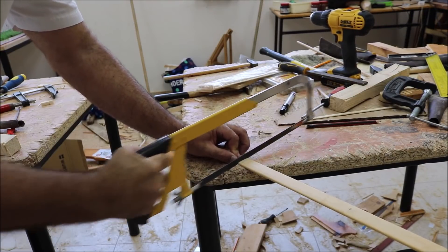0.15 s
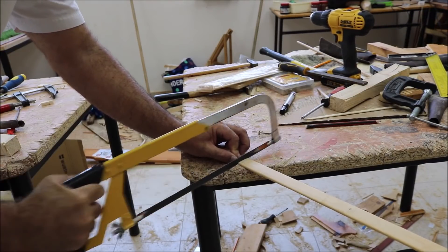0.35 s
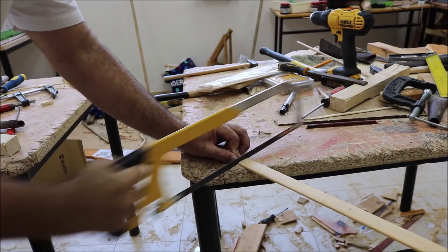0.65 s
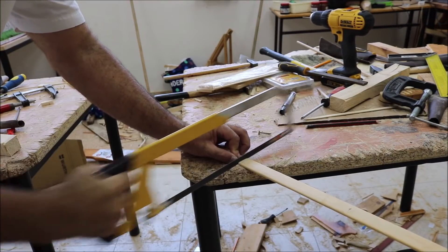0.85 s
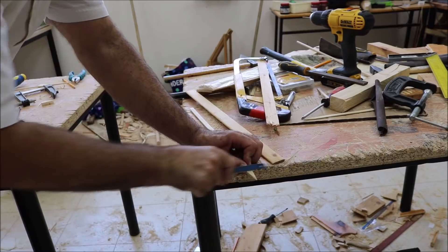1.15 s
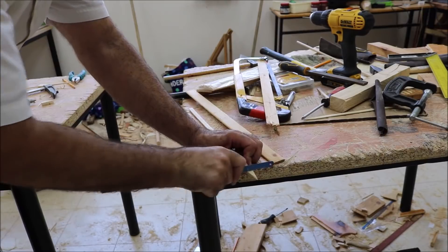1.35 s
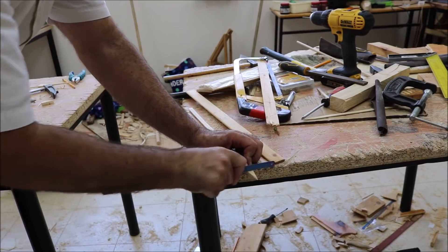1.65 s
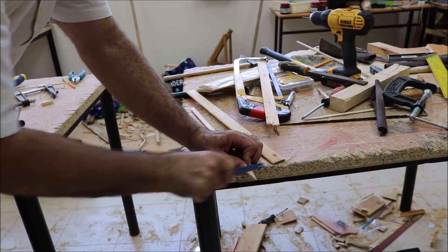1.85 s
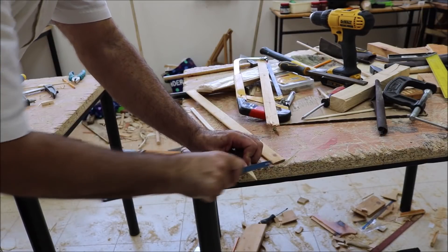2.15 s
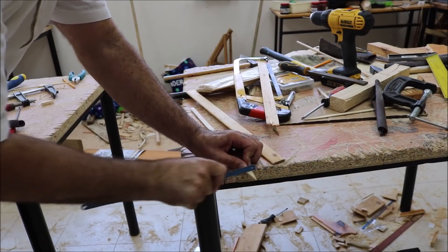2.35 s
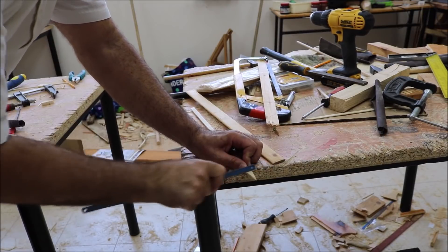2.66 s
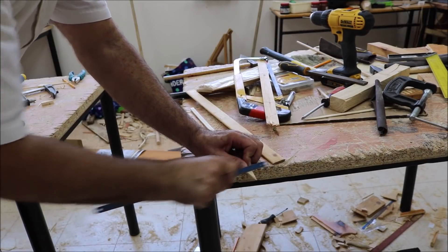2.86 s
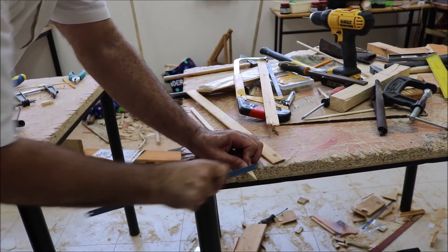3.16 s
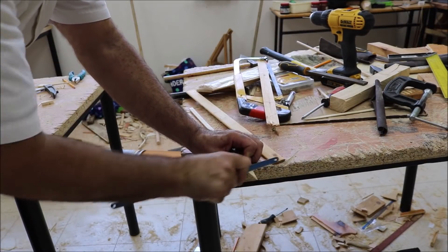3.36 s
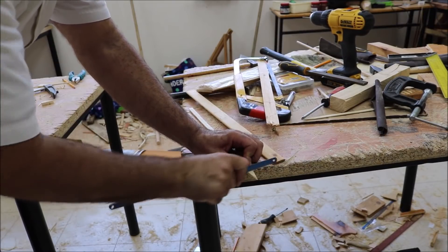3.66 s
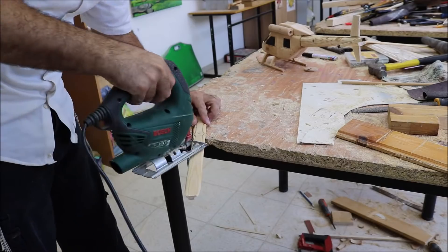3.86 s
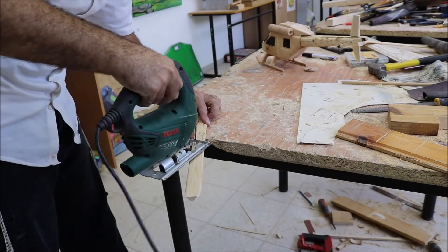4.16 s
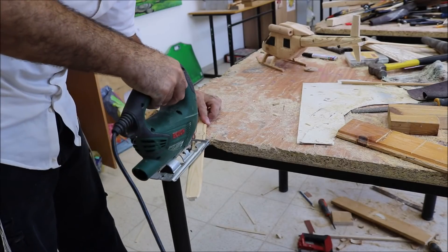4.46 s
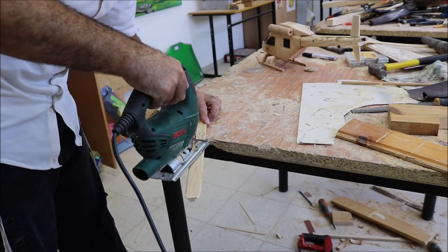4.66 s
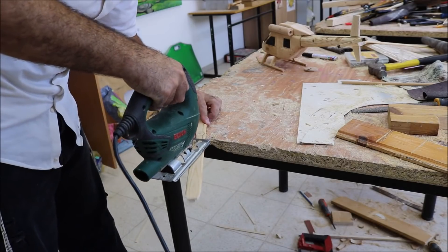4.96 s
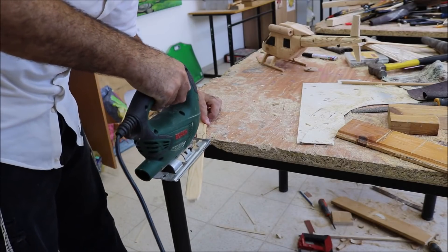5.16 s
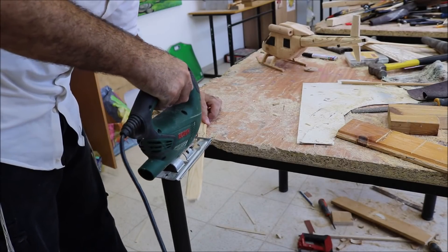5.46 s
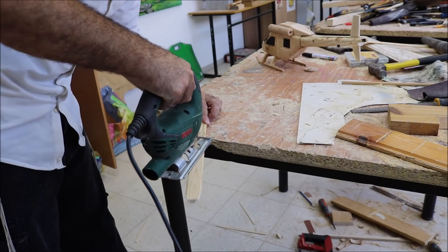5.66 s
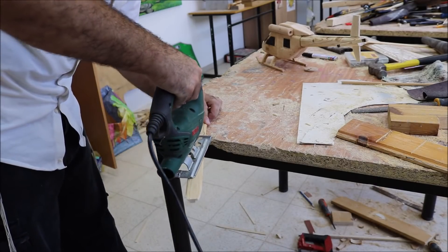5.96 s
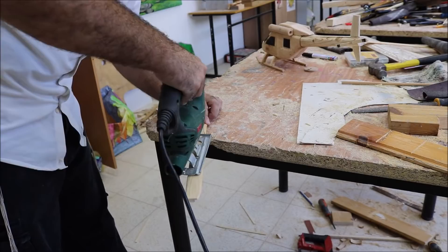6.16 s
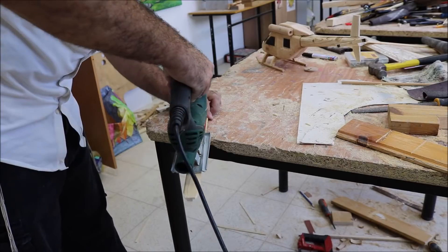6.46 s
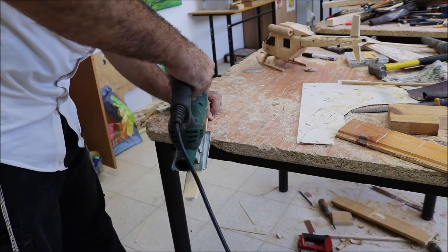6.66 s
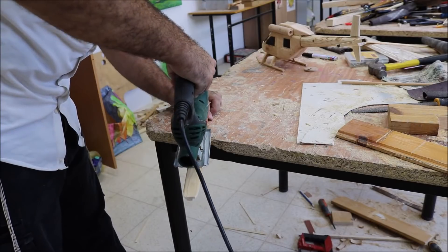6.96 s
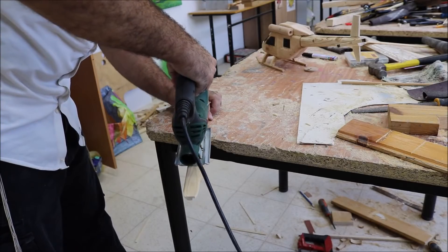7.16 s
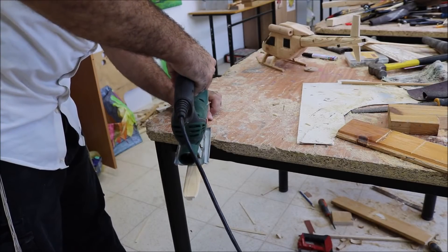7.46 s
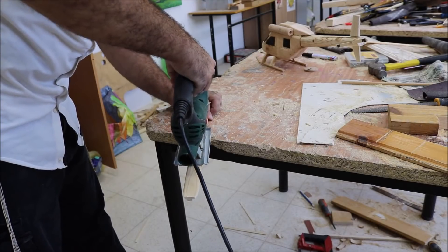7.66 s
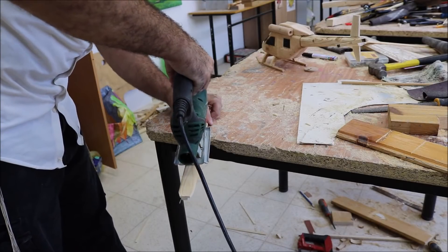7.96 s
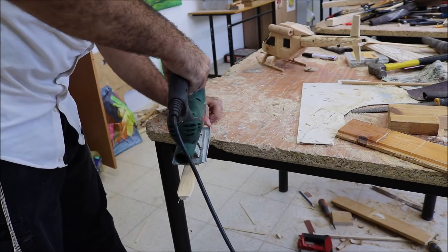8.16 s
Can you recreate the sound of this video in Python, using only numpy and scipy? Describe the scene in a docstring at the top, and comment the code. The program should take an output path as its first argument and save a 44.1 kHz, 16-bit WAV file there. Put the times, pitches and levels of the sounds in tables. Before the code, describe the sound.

Hand saws rasp back and forth through wood in a workshop, followed by an electric jigsaw starting up, cutting and coasting down.

```python
"""A wooden strip is sawn on a bench, over the hum of a small workshop.
0-1 s: a frame hacksaw; its teeth catch and ring the frame and the taut blade.
1-3.8 s: a bare hand-held blade; it rings the strip, tears fibres and shakes the bench.
From 4 s: an electric jigsaw is blipped, runs up, cuts, dips, cuts on and coasts down;
its gears whine and clatter once a stroke, its brushes and fan hiss."""
import sys
import numpy as np
from scipy import signal
from scipy.fft import rfft, irfft, next_fast_len
from scipy.io import wavfile
from scipy.ndimage import uniform_filter1d, map_coordinates

SR = 44100
rng = np.random.default_rng(int(sys.argv[2]) if len(sys.argv) > 2 else 0)


def dump(signal):
    """Clip the signal to [-1, 1] and save it as 16-bit WAV at the path in sys.argv[1]."""
    limited = np.clip(np.atleast_2d(signal).T, -1, 1)
    pcm = np.round(limited * 32767).astype(np.int16)
    wavfile.write(sys.argv[1], SR, pcm)


N = 366471
T = np.arange(N) / SR
N_FFT = next_fast_len(N + SR, True)  # room for tails
TOP_HZ = 15850
FRAME_SPAN_S, BLADE_SPAN_S = (-0.01, 1.017), (1.05, 3.79)
TURNS_PER_STROKE = 6

# workshop hum spectrum: f/Hz, level/dB
SHOP_SPECTRUM = [(18, -81), (30, -49), (189, -12), (245, -11.5), (287, -10), (449, -12), (600, -3),
                 (702, -9.5), (780, -3.5), (1860, -13), (2120, -17), (2290, -18), (16000, -36)]
# workshop hum after the hand saws: t/s, level/dB
SHOP_LEVEL = [(3.96, -47), (4.04, -64), (4.35, -58), (4.8, -71.5), (7.75, -70.5), (8.05, -54), (8.3, -47.5)]
# stereo images: f/Hz, left-right likeness/0-1, left minus right/dB
BENCH_STEREO = [(100, 0.93, 1.5), (332, 0.92, 0.5), (760, 0.8, 2), (1600, 0.32, 0), (2380, 0.05, -2.5),
                (4700, 0.37, -1), (9000, 0.13, -1), (14000, .02, 0.5)]
JIGSAW_STEREO = [(1700, 1, 0.9), (3340, 0.96, 0.49), (4830, 0.5, 1), (9400, 0.28, -2), (13000, 0.55, -1.7)]

# frame saw, pull and push in turn: start/s, body gain/dB, rasp gain/dB
FRAME_STROKES = [(-0.095, -26.5, -43), (0.118, -28.5, -41.5), (0.345, -27, -44.5), (0.562, -27, -42),
                 (0.806, -27.5, -45)]
# bare-blade strokes: start/s, force/dB
BLADE_STROKES = [(0.98, -7.5), (1.12, -2), (1.28, -4.5), (1.422, 2), (1.565, -2), (1.69, 1.5), (1.839, -1),
                 (1.97, 0.5), (2.125, -1), (2.239, 0.5), (2.39, -0.5), (2.537, 1.5), (2.705, -1.5),
                 (2.83, 0), (2.975, -1), (3.116, 1), (3.28, -0.5), (3.41, 0.5), (3.555, -2.5), (3.682, 1)]
# resonances of saw and strip, before bending: f/Hz, width/Hz, level/dB
FRAME_MODES = [(692, 24, -2), (754, 42, 1), (837, 66, 4.5), (1400, 390, -8), (1503.6, 70, -1.5),
               (1656, 170, 1), (2020, 67, -2), (2347, 120, -3.5), (2870, 230, -15), (3150, 160, -22)]
BLADE_MODES = [(903, 18, -8), (1060, 36, 3.5), (1285, 55, 4.5), (1400, 280, 8), (1550, 98, 2),
               (1727, 24, 2.5), (1994, 180, 1), (2300, 73, -2.5), (2700, 370, -19)]
# taut blade's spans either side of the cut: f drawn back/Hz, f pushed forward/Hz, level/dB
SPAN_TONES = [(2192, 620, 0), (4600, 1330, -5), (395.4, 1250, -13), (2190, 5600, 2)]
# their radiation by frame and strip: f/Hz, gain/dB
FRAME_RADIATION = [(200, -25), (400, -29), (560, -0.5), (780, 5), (1080, -13.5), (1500, -2), (2000, -6),
                   (2500, -12), (3300, -11), (4200, -24), (8000, -24)]
# spectra of tearing fibres, bright ticks and the shaking bench: f/Hz, level/dB
FRAME_RASP = [(1470, -18), (2500, -3), (2790, -29), (2990, -14), (4730, -10), (8460, -13.5), (9960, -19.5),
              (14500, -26.5), (16000, -34)]
BLADE_RASP = [(1470, -16.5), (2500, 0), (3080, -13.5), (3600, -18), (5690, -16.5), (6250, -12.5),
              (6970, -16), (8870, -13), (11200, -23.5), (16000, -31)]
TICK_SPECTRUM = [(1500, -22), (5000, -14), (10000, 9), (14000, 4), (16000, -6)]
BENCH_SPECTRUM = [(15, -38), (25, -1), (54, 1), (97, -7.5), (130, 0), (240, -1.5), (330, -4.5), (390, -2.5),
                  (430, -4.5), (671, -27), (700, -30), (910, -44), (1540, -120)]
# binding blades squawk, the bench judders: centre/s, half length/s, f/Hz, level/dB
FRAME_SQUAWKS = [(0.21, 0.03, 1510, -25.5), (0.268, 0.01, 760, -22), (0.445, 0.0061, 794, -20),
                 (0.496, 0.018, 2380, -30), (0.641, 0.01, 2020, -27.5), (0.662, 0.015, 1630, -23),
                 (0.73, 0.081, 790, -31.5), (0.893, 0.014, 790, -41)]
BLADE_SQUAWKS = [(1.372, 0.012, 1400, -33.5), (1.785, 0.056, 827, -35.5), (2.61, 0.039, 1060, -40),
                 (2.615, 0.022, 2020, -35), (3.625, 0.037, 1540, -29.5), (3.643, .04, 1400, -40)]
BENCH_JUDDERS = [(1.217, 0.05, 220, -40), (1.678, 0.064, 207, -41.5), (2.902, 0.17, 155, -48.5)]
# sharp ticks of the blade, mostly where a stroke turns: t/s, relative level/dB
BLADE_TICKS = [(1.1427, -45), (2.2831, -43), (2.398, -34), (2.566, -34), (3.1187, -32), (3.5428, -31.5),
               (3.7199, -37)]

# jigsaw trigger held: on/s, off/s
TRIGGER = [(3.964, 4.002), (4.402, 4.426), (4.642, 4.666), (4.732, 6.37), (6.524, 7.569)]
# rotor target speed, sagging as the teeth bind: t/s, f/Hz
TARGET_SPEED = [(5.14, 420.8), (5.69, 419.3), (5.93, 411), (6.09, 415.2), (6.37, 417.3), (6.8, 416.3),
                (7.3, 419.4), (7.57, 418.4)]
# cuts: start/s, end/s, feed time/s, depth/0-1, shudder centre/s, half length/s, boost/dB
CUTS = [(5.395, 6.41, 0.78, 0.67, 5.89, 0.1, 10.5), (6.5, 7.616, 0.16, 0.83, 6.83, 0.24, 8.5)]
# gear and fan tones: order/stroke rate, first-colour level/dB, second-colour level/dB,
# change as run-up ends/dB
WHINE_TONES = [(6, -75, -88, 0), (9, -76, -80, 0), (12, -68, -73, 0), (15, -73, -64, 2), (18, -72, -56, -4),
               (21, -62, -60, 3), (22, -67, -68, 0), (27, -57, -66, 0), (30, -66, -56, 0),
               (33, -65, -53.5, -4), (36, -58, -51, -4), (38, -64, -57, 0), (39, -59, -58, 5),
               (40, -63, -58, 0), (42, -58, -58, 4), (56, -57, -56, 1), (57, -58, -53, 0),
               (60, -62, -55, 0), (96, -60, -52, -4), (105, -60, -52, -4), (144, -49, -54, 0),
               (156, -48, -54, 0), (168, -51, -42.5, 2), (174, -49, -42, 1), (186, -50, -49, 0)]
# gear mesh, main fan whine, motor drone: t/s, level/dB
MESH_LEVEL = [(4.6, -72), (4.72, -62), (4.76, -55), (4.82, -49.5), (4.92, -48), (5.45, -49), (5.7, -51),
              (5.9, -45.5), (6.12, -54), (6.38, -56), (6.46, -57), (6.53, -55.5), (6.61, -48), (6.77, -48),
              (6.9, -60), (7.2, -55), (7.6, -55), (7.8, -60), (7.95, -76)]
FAN_LEVEL = [(4.7, -58), (4.78, -44), (4.84, -40), (5.05, -39.5), (5.3, -42), (5.65, -45), (5.95, -40.5),
             (6.3, -40.5), (6.45, -56), (6.55, -51), (6.66, -47), (6.95, -47), (7.15, -53), (7.55, -51),
             (7.7, -80)]
DRONE_LEVEL = [(4.7, -80), (4.9, -63), (5.0, -50.5), (5.35, -50), (5.65, -52), (5.9, -65), (6.15, -58),
               (6.35, -58), (6.45, -72), (6.62, -61), (6.75, -65), (6.95, -57), (7.5, -53), (7.7, -80)]
# spectra of brush and fan hiss, casing rattle and base-plate bumps: f/Hz, level/dB
HISS_SPECTRUM = [(1470, -38), (2500, -14.5), (2810, -13), (3080, -15), (4050, -5.5), (4370, -6.5),
                 (5920, -2), (9010, -1), (13100, 1.5), (15200, 0), (16000, -11)]
CASING_SPECTRUM = [(100, -41), (250, -29), (700, -20.5), (1300, -13), (1750, -6.5), (2800, -3),
                   (4000, -2.5), (6000, -3), (12000, -55)]
BUMP_SPECTRUM = [(40, -45), (80, -26), (150, -4), (290, 1), (480, -1), (700, -3), (1100, -13), (3000, -35)]
# bursts of hiss at switch-on, base-plate bumps on the strip: t/s, level/dB, decay/s
SWITCH_ON_BURSTS = [(3.965, -22.5, 0.045), (4.403, -28, 0.038), (4.643, -29, 0.073), (6.527, -33, 0.15)]
PLATE_BUMPS = [(6.246, -49, 0.0067), (6.266, -50, .009), (6.333, -47.5, 0.011), (6.38, -46, 0.0069),
               (6.47, -54, 0.0088)]


def undb(db):
    """Decibels to gain."""
    return 10 ** (np.asarray(db) / 20)


def unit(x):
    """Scale to rms 1."""
    return x / np.sqrt(np.mean(x ** 2))


def curve(table):
    """A (t/s, value) table at every sample."""
    return np.interp(T, *np.transpose(table))


def gate(start_s, end_s, fade_s):
    """1 between two times, with ramps."""
    return np.clip(np.minimum(T - start_s, end_s - T) / fade_s, 0, 1)


def swell(centre_s, half_s):
    """Gaussian envelope."""
    return np.exp(-((T - centre_s) / half_s) ** 2)


def bursts(table):
    """Envelope of sudden onsets with exponential decay."""
    return sum(undb(db) * (T >= s) * np.exp(-np.abs(T - s) / decay_s) for s, db, decay_s in table)


def on_bins(points):
    """A (f/Hz, value) table at every FFT bin."""
    hz, value = np.transpose(points)
    bin_hz = np.arange(N_FFT // 2 + 1) * SR / N_FFT
    return np.interp(np.log(bin_hz + 1), np.log(hz), value)


def filtered(x, response):
    """Apply a gain per FFT bin."""
    return irfft(rfft(x, N_FFT) * response, N_FFT)[..., :N]


def colour(x, points):
    """Filter by a (f/Hz, level/dB) outline; rms 1."""
    return unit(filtered(x, undb(on_bins(points))))


def ring(x, modes):
    """Resonator bank; rms 1."""
    return unit(sum(undb(db) * signal.lfilter(*signal.iirpeak(hz, hz / width_hz, SR), x)
                    for hz, width_hz, db in modes))


def bend(x, ratio):
    """Shift the pitch of a steady sound by a moving ratio."""
    return map_coordinates(x, [np.cumsum(ratio)], order=3, mode="wrap")


def walk(rate_hz):
    """Smooth random drift, spread near 1."""
    hold = max(int(SR / rate_hz), 2)
    return 1.2 * uniform_filter1d(np.repeat(rng.standard_normal(N // hold + 1), hold), hold)[:N]


def grit(grain_db, rate_hz):
    """Noise in uneven grains; rms 1."""
    return unit(rng.standard_normal(N) * undb(grain_db * np.tanh(walk(rate_hz) / 2) * 2))


def tone(rms_db, phase_rad):
    """Sine at an rms level."""
    return np.sqrt(2) * undb(rms_db) * np.sin(phase_rad)


def ragged_tone(hz, width_hz):
    """Tone with jitter in pitch and level; rms 1."""
    phase_rad = 2 * np.pi * np.cumsum(hz + width_hz * walk(450)) / SR
    return unit(np.sin(phase_rad) * undb(2.8 * walk(160)))


def room(x, wet_db, t60_s, stereo):
    """Direct sound plus a dense tail off bench and walls; side reflections part left from right."""
    t = T[:SR // 2]
    tails = rng.standard_normal((2, len(t))) * undb(-60 * t / t60_s) * (t > 0.0005)
    ahead, side = rfft(tails / np.linalg.norm(tails, axis=1, keepdims=True), N_FFT)
    hz, likeness, pan_db = np.transpose(stereo)
    likeness = np.clip(on_bins(np.c_[hz, likeness]), -0.3, 0.995)
    mid = (1 + undb(wet_db) * ahead) / np.sqrt(1 + undb(wet_db) ** 2)
    side *= np.sqrt((1 - likeness) / (1 + likeness))
    sign = np.array([[1], [-1]])
    return filtered(x, (mid + sign * side) * undb(sign * on_bins(np.c_[hz, pan_db]) / 2))


def shop_hum():
    """Restless noise: silent briefly between the hand saws, low while the motor runs."""
    level_db = np.select([T < BLADE_SPAN_S[0], T < BLADE_SPAN_S[1]], [-44.5, -46.5], curve(SHOP_LEVEL))
    air = colour(rng.standard_normal(N), SHOP_SPECTRUM) * undb(level_db + 1.3 * walk(22))
    gap = gate(FRAME_SPAN_S[1], BLADE_SPAN_S[0], fade_s=0.002)
    return room(air, wet_db=-6.5, t60_s=0.17, stereo=BENCH_STEREO) * (1 - gap)


def strokes(table, end_s):
    """Hand motion: strokes done, blade speed 0-1, and the current stroke's columns."""
    start_s, *columns = np.transpose(table)
    done = np.interp(T, np.r_[start_s, end_s], np.arange(len(start_s) + 1))
    row = np.minimum(done.astype(int), len(start_s) - 1)
    speed = np.abs(np.sin(np.pi * done))
    return done, speed, *(uniform_filter1d(column[row], size=600) for column in columns)


def teeth(rate_hz, jitter, scatter_db):
    """One catch per passing tooth, uneven in time and force; rms 1."""
    count = np.floor(np.cumsum(rate_hz * np.exp(jitter * walk(300))) / SR)
    return unit(np.diff(count, prepend=0) * undb(scatter_db * walk(500)))


def blade_spans(forward):
    """The cut divides the taut blade: one span lengthens as the other shortens, so their tones slide."""
    spans = sum(undb(db) * ragged_tone(back_hz * (front_hz / back_hz) ** forward, width_hz=52.3)
                for back_hz, front_hz, db in SPAN_TONES)
    return filtered(spans, undb(on_bins(FRAME_RADIATION)))


def frame_saw(rasp_lead_s=0.017):
    """Taut blade: teeth rasp, then honk through the frame; their own note follows blade speed."""
    done, speed, body_db, rasp_db = strokes(FRAME_STROKES, end_s=1)
    forward = (1 + np.cos(np.pi * done)) / 2
    catches = teeth(760, jitter=0.09, scatter_db=4.5)
    honk_hz = 1480 + 168.9 * speed ** 2 - 197.3 * forward
    honk = ring(catches + 0.5 * grit(grain_db=2, rate_hz=700), FRAME_MODES)
    honk = bend(honk, honk_hz / FRAME_MODES[4][0])  # all modes move with the fifth
    honk = colour(honk, [(150, -18), (400, -30), (620, 1), (3300, -1.5), (6000, -10.5), (14000, -37)])
    spans = blade_spans(forward)
    rasp = colour(grit(grain_db=0.5, rate_hz=1800) + 0.7 * catches, FRAME_RASP)
    tooth_note = ragged_tone(1340 + 1145 * speed, width_hz=61.5)
    body = honk * undb(-3) * (0.71 + 1.1 * speed ** 2)
    body += spans * undb(-5) * (0.48 + speed ** 2)
    body += tooth_note * undb(-10) * speed ** 2
    early_speed = np.interp(T + rasp_lead_s, T, speed)
    dry = body * undb(body_db) + rasp * undb(rasp_db + 4) * (0.25 + 1.5 * early_speed ** 3)
    for s, half_s, hz, db in FRAME_SQUAWKS:
        dry += ragged_tone(hz, width_hz=34) * undb(db) * swell(s, half_s)
    return room(dry, wet_db=-3.5, t60_s=0.34, stereo=BENCH_STEREO) * gate(*FRAME_SPAN_S, fade_s=0.0027)


def fibre_snaps(rate_hz=16, spread_db=19, decay_s=0.00051):
    """Splitting fibres tick faintly at random."""
    ticks = (rng.random(N) < rate_hz / SR) * undb(spread_db * rng.uniform(-0.83, 1, N))
    cracks = signal.lfilter([1], [1, -np.exp(-1 / (decay_s * SR))], ticks) * rng.standard_normal(N)
    return colour(cracks, TICK_SPECTRUM) * undb(-62)


def blade_ticks(decay_s=0.0014):
    """The bare blade ticks sharply, mostly where a stroke turns."""
    envelope = bursts([(s, db - 1.5, decay_s) for s, db in BLADE_TICKS])
    return colour(rng.standard_normal(N), TICK_SPECTRUM) * envelope


def strip_ring(drive, wander_db=2.5, wander_ratio=0.012):
    """Resonances wander in level and pitch as the bare blade's contact point shifts."""
    gains = [undb(db + wander_db * walk(7)) for _, _, db in BLADE_MODES]
    body = sum(ring(drive, [mode]) * gain for mode, gain in zip(BLADE_MODES, gains))
    body = bend(body / np.linalg.norm(gains, axis=0), 1 + wander_ratio * walk(9))
    return colour(body, [(200, -26), (700, -3), (2900, 2), (4000, -5), (14000, -7)])


def bare_blade():
    """Slack blade: ragged catches ring the strip, fibres tear, the bench rumbles."""
    _, speed, force_db = strokes(BLADE_STROKES, end_s=3.817)
    sawing_s = np.clip(T, *BLADE_SPAN_S) - BLADE_SPAN_S[0]
    rasp_db = -46.5 + 0.72 * force_db + 2 * sawing_s  # rises as the cut deepens
    bench_db = -46 - 0.87 * sawing_s  # falls as the blade settles in its groove
    catches = teeth(350 + 500 * speed, jitter=0.3, scatter_db=3)
    drive = 0.72 * catches + grit(grain_db=3, rate_hz=720)
    dry = strip_ring(drive) * undb(-36 + force_db) * (0.47 + 0.82 * speed ** 2.7)
    rasp = colour(grit(grain_db=3, rate_hz=1100) + 0.31 * catches, BLADE_RASP)
    dry += rasp * undb(rasp_db) * (0.19 + 1.62 * speed ** 1.52)
    for s, half_s, hz, db in BLADE_SQUAWKS + BENCH_JUDDERS:
        dry += ring(drive, [(hz, 35, 0)]) * undb(db) * swell(s, half_s)
    bench = colour(grit(grain_db=3, rate_hz=40), BENCH_SPECTRUM) * undb(bench_db) * (0.88 + 0.13 * speed)
    dry += bench + fibre_snaps() + blade_ticks()
    return room(dry, wet_db=-4.5, t60_s=0.35, stereo=BENCH_STEREO) * gate(*BLADE_SPAN_S, fade_s=0.0036)


def motor(spin_up_s=0.081, coast_s=0.432, stall_pull=2.7):
    """Rotor speed in Hz: quick run-up on the trigger, slow coast after release."""
    speed = np.zeros(N)
    for on_s, off_s in TRIGGER:
        deficit = 1 - np.interp(on_s, T, speed)
        fade = np.exp(-np.clip(T - on_s, 0, off_s - on_s) / spin_up_s)
        driven = 1 - deficit * fade / (1 + stall_pull * deficit * (1 - fade))
        speed = np.where(T > on_s, driven * np.exp(-np.maximum(T - off_s, 0) / coast_s), speed)
    return np.maximum(speed * curve(TARGET_SPEED), 1)


def cutting(release_s=0.027):
    """Blade load 0-1, and the strip's vibration, which swells once in each cut."""
    load, shake = np.zeros(N), np.zeros(N)
    for start_s, end_s, feed_s, depth, shudder_s, half_s, shudder_db in CUTS:
        bite = depth * np.clip(np.minimum((T - start_s) / feed_s, (end_s - T) / release_s), 0, 1)
        load += bite
        shake += bite * undb(shudder_db * swell(shudder_s, half_s))
    return np.clip(load, 0, 1), shake


def plate_bumps():
    """The base plate knocks on the strip."""
    knocks = colour(rng.standard_normal(N), BUMP_SPECTRUM) * bursts(PLATE_BUMPS)
    return signal.sosfilt(signal.butter(2, 160, "high", fs=SR, output="sos"), knocks)


def switch_on_bursts():
    """A short, bright burst of hiss as the motor starts."""
    noise = grit(grain_db=-0.5, rate_hz=3600)
    midrange = undb(-19) * colour(noise, CASING_SPECTRUM)
    return (colour(noise, HISS_SPECTRUM) + midrange) * bursts(SWITCH_ON_BURSTS)


def brush_fizz():
    """The brushes fizz through the blips and first run-up."""
    fizz = ring(grit(grain_db=-9, rate_hz=3000), [(13300, 1900, 0)])
    return ring(fizz, [(13100, 1900, 0)]) * undb(-36) * gate(3.96, 5.4, fade_s=0.081)


def commutator(rotor_hz, power, bars=56, loudest_rotor_hz=165, log_spread=0.45):
    """The commutator whistles as the rotor coasts through low speeds."""
    bar_hz = bars * rotor_hz
    coasting = np.exp(-(np.log(rotor_hz / loudest_rotor_hz) / log_spread) ** 2) * (1 - power)
    return undb(-39.8) * coasting * (bar_hz < TOP_HZ) * ragged_tone(bar_hz, width_hz=100)


def clatter(stroke, rotor_db):
    """A rattle each stroke, rotor harmonics offset by rotor_db; loose parts slowly shift its pattern."""
    orders = np.arange(35, 225)
    gains = undb(rotor_db * (orders % TURNS_PER_STROKE == 0))
    out = np.zeros(N)
    for _ in range(3):
        bins = np.zeros(orders[-1] + 1, complex)
        bins[orders] = gains * np.exp(2j * np.pi * rng.random(len(orders)))
        cycle = irfft(bins, 2 ** 13)
        out += np.interp(stroke % 1, np.linspace(0, 1, len(cycle)), cycle) * np.cos(walk(3))
    return unit(out / np.sqrt(uniform_filter1d(out ** 2, size=4000)))


def blend(share, periodic, noise):
    """Equal-power mix; share is the periodic part."""
    return np.sqrt(share) * periodic + np.sqrt(1 - share) * noise


def hiss_and_rattle(turns, speed, load, power):
    """Brush and fan hiss plus casing rattle, chopped once and twice a rotor turn."""
    stroke = turns / TURNS_PER_STROKE
    swung = T > 6.05  # saw swung round, vents exposed
    chop = 1 + (0.3 - 0.25 * power) * np.cos(2 * np.pi * turns)
    chop += (0.34 - 0.2 * load) * np.cos(4 * np.pi * turns)
    hiss = blend((0.08 + 0.17 * power) * speed ** 2,
                 clatter(stroke, rotor_db=-10.5), grit(grain_db=1.5, rate_hz=4500))
    rattle = blend(0.4 * power * speed ** 2, clatter(stroke, rotor_db=2.5), grit(grain_db=2, rate_hz=300))
    return (colour(chop * hiss, HISS_SPECTRUM) * undb(-31 + 0.87 * swung)
            + colour(chop * rattle, CASING_SPECTRUM) * undb(-42.5 + 2.5 * swung))


def whine(stroke, speed, colour_mix, power, waver_db=2.2, mesh_order=28, fan_order=162, drone_order=24):
    """Gear, fan and motor tones at multiples of the stroke rate; the colour changes during each cut."""
    out = np.zeros((2, N))
    stroke_rad = 2 * np.pi * stroke
    driven = 0.22 + 0.78 * power  # gears run slack off the trigger
    backlash_rad = 2 * (1 - speed) * walk(180)
    run_up_end = sum(swell(on_s + 0.28, half_s=0.12) for on_s, _ in TRIGGER[-2:])
    for order, first_db, second_db, run_up_db in WHINE_TONES:
        level_db = first_db + (second_db - first_db) * colour_mix + run_up_db * run_up_end
        level_db += waver_db * (walk(7) + 0.7 * walk(60))
        # high fan tones sing all the way up, the rest only near full speed
        exponent = 2 if order >= 144 else 12 if order > mesh_order else 20
        stereo_rad = rng.choice([-1, 1]) * order / 260 * np.array([[1], [-1]])
        jitter_rad = (0.2 + order / 500) * walk(90)
        phase_rad = order * stroke_rad + backlash_rad + jitter_rad + stereo_rad
        out += driven * speed ** exponent * tone(level_db, phase_rad)
    out += tone(curve(FAN_LEVEL) + waver_db * walk(25), fan_order * stroke_rad + backlash_rad)
    out += tone(curve(DRONE_LEVEL) + waver_db * walk(25) / 2, drone_order * stroke_rad + backlash_rad)
    stutter_db = np.clip(120 * (1 - speed), 1.5, 4) * walk(55)  # deeper below full speed
    mesh_rad = mesh_order * stroke_rad + backlash_rad + 0.35 * walk(140)
    return out + tone(curve(MESH_LEVEL) + stutter_db, mesh_rad)


def jigsaw(rotor_hz, fade_below_hz=83, hum_order=9):
    """The rotor drives hiss, rattle and whine; the strip hums under the blade."""
    load, shake = cutting()
    turns = np.cumsum(rotor_hz * (1 + 0.000536 * walk(40))) / SR
    stroke, speed = turns / TURNS_PER_STROKE, rotor_hz / rotor_hz.max()
    power = sum(gate(on_s, off_s, fade_s=0.019) for on_s, off_s in TRIGGER)
    started = T > TRIGGER[0][0]
    dry = hiss_and_rattle(turns, speed, load, power) * rotor_hz / np.hypot(rotor_hz, fade_below_hz)
    dry += switch_on_bursts() + plate_bumps() + brush_fizz() + commutator(rotor_hz, power)
    tones = whine(stroke, speed, load, power) * started
    strip_hum = shake * tone(-58.5, 2 * np.pi * hum_order * stroke)
    return room(dry * started, wet_db=-5, t60_s=0.24, stereo=JIGSAW_STEREO) + tones + strip_hum


def scene():
    """Three saws in turn over the workshop hum."""
    return frame_saw() + bare_blade() + jigsaw(motor()) + shop_hum()


def record(dry):
    """Band limit: 36 Hz to TOP_HZ."""
    dry = signal.sosfilt(signal.butter(4, 36, "high", fs=SR, output="sos"), dry)
    return signal.sosfilt(signal.ellip(12, 0.1, 80, TOP_HZ, fs=SR, output="sos"), dry)


dry = scene()
out = record(dry)
dump(out)
```